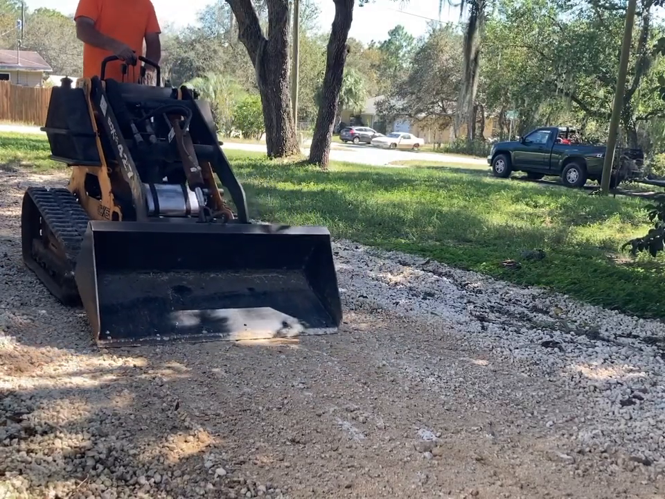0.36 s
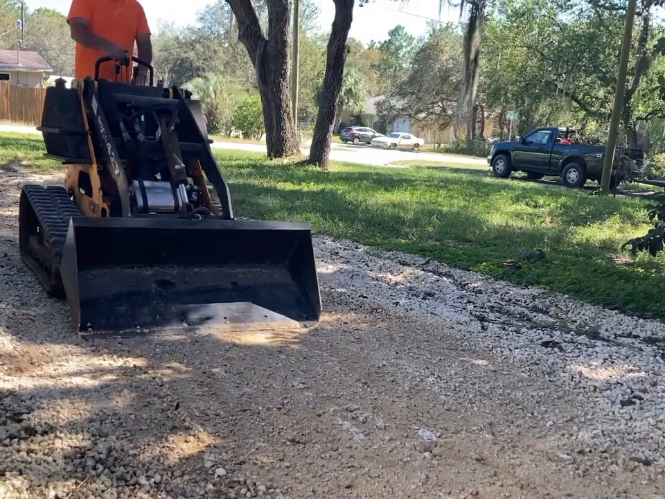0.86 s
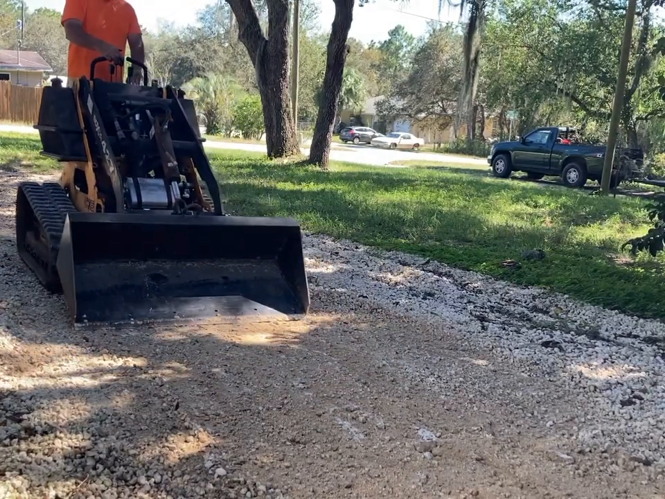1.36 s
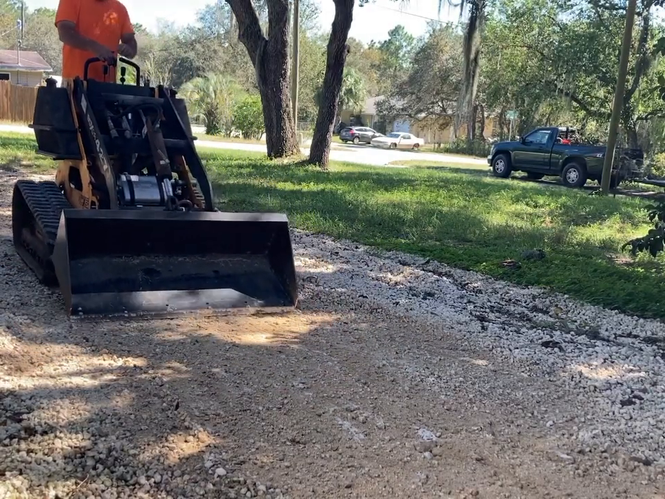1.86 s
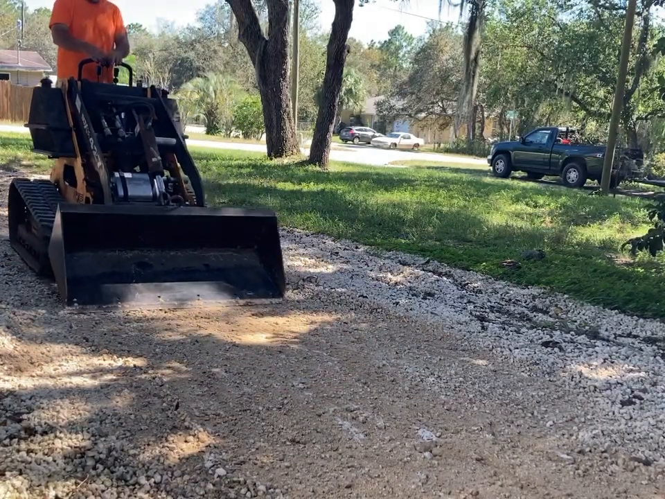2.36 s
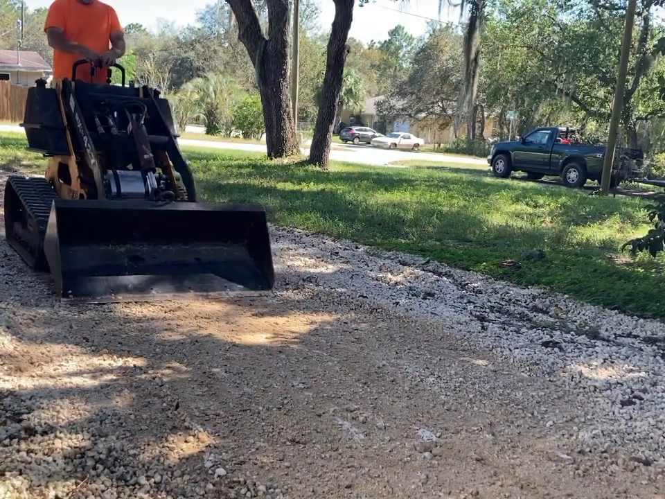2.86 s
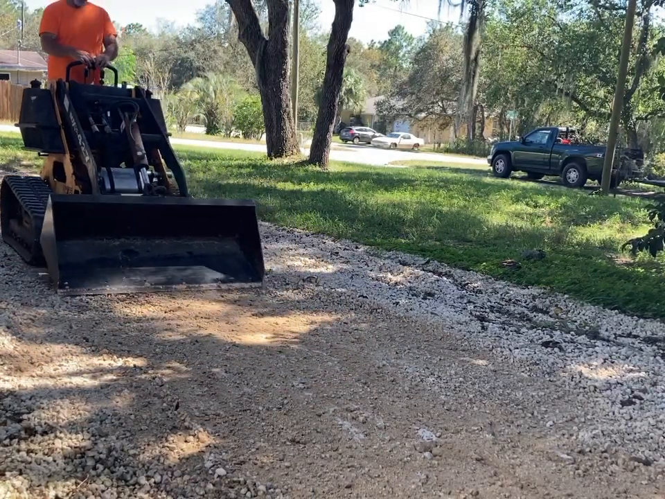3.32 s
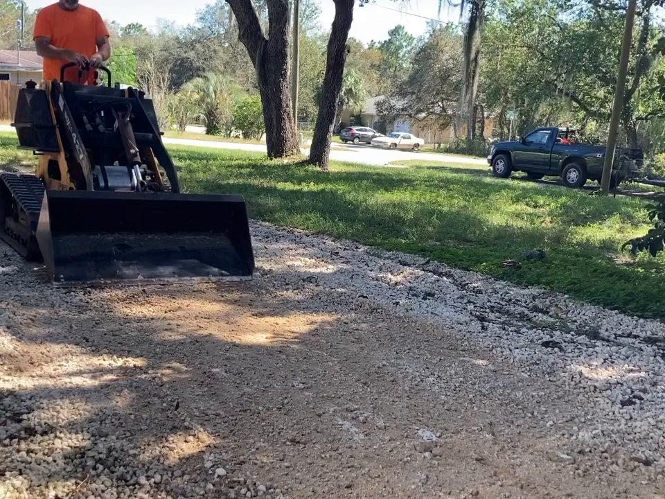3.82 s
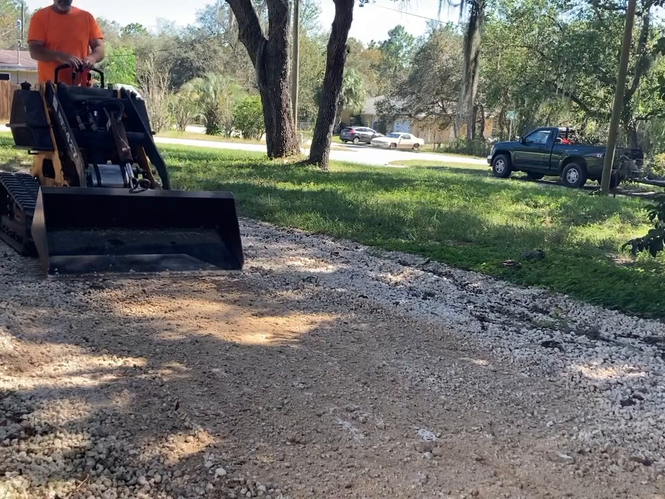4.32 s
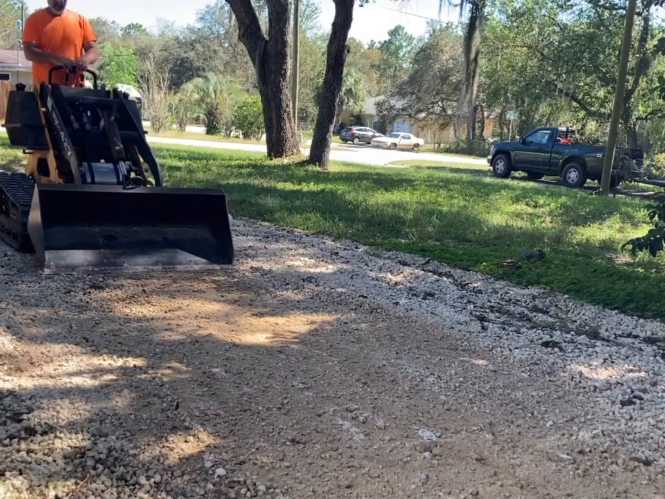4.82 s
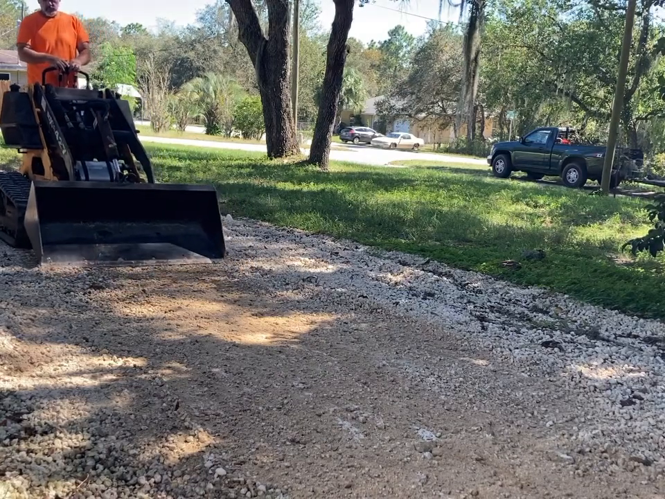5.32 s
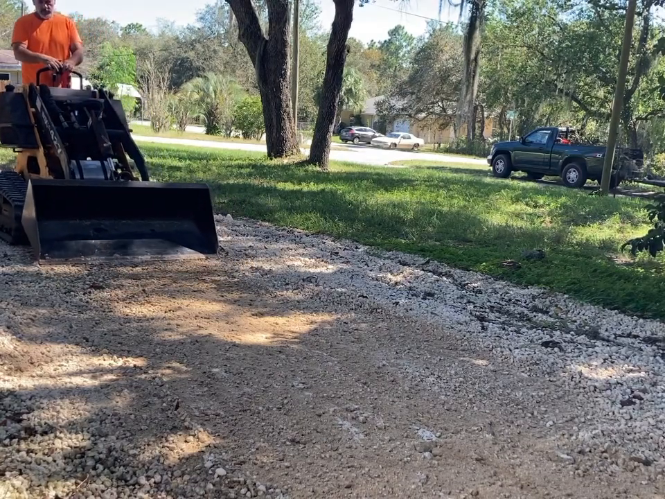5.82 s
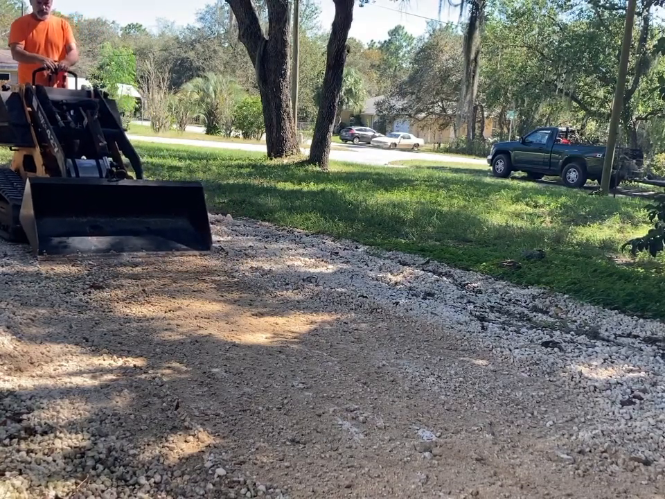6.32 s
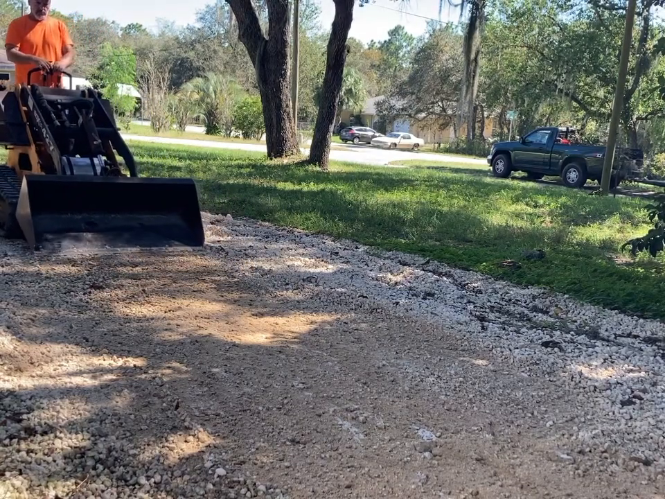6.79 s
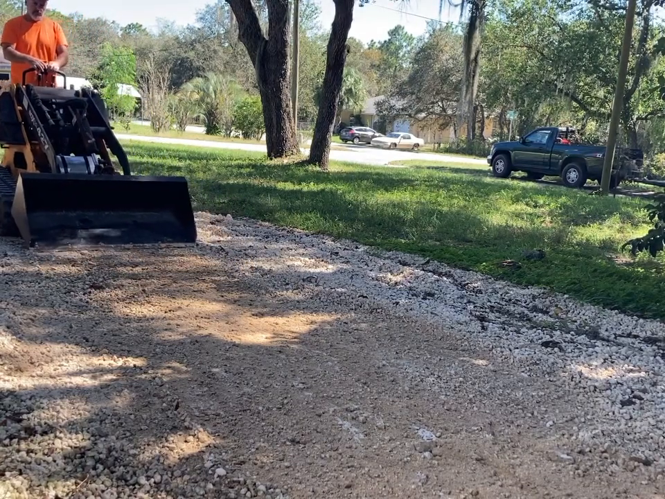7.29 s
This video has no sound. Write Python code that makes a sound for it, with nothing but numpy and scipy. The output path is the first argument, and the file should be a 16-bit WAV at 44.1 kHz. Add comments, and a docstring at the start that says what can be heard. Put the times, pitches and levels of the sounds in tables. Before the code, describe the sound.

Low, fluttering engine hum with mechanical clatter and fine hiss outdoors, while a steel bucket bangs irregularly, hardest near the end.

```python
"""Tracked loader backing away

A two-cylinder petrol engine on a small tracked loader backs slowly away over gravel, outdoors.
Cycle-locked partials make the muffler hum and whines; shaped noise makes clatter, whistles, crunch, air, puffs.
Grit bursts ring the loose steel bucket's modes as the tracks jolt. Two microphone ports hear it from the side.
"""
import sys
import numpy as np
from scipy import signal
from scipy.fft import rfft, irfft
from scipy.io import wavfile
from scipy.ndimage import uniform_filter1d

SR = 44100
rng = np.random.default_rng(int(sys.argv[2]) if len(sys.argv) > 2 else 0)


def nominal_scale(level):
    """Amplitude ratio for a level in decibels (scalar or array-like)."""
    x = np.asarray(level, float) / 20
    return 10 ** x


def master_out(mix):
    """Clip the mix to full scale and print it as 16-bit PCM to the path in sys.argv[1]."""
    frames = np.transpose(np.atleast_2d(mix))
    ceiling = np.clip(frames, -1, 1)
    pcm = np.round(ceiling * 32767).astype(np.int16)
    wavfile.write(sys.argv[1], SR, pcm)


N = 338247

# four-stroke cycle rate: start_s, cycles_per_s
SPEED = [(0.0, 23.69), (0.39, 24.185), (1.18, 24.386), (1.38, 24.991), (1.57, 25.462), (1.97, 25.439),
         (2.56, 25.69), (2.95, 25.513), (3.34, 25.906), (3.93, 25.546), (4.52, 25.774), (5.11, 25.698),
         (5.7, 25.507), (5.9, 25.04), (6.29, 24.954), (6.69, 25.137), (7.08, 25.072), (7.67, 24.673)]
# engine pull; eases as the loader coasts back, returns after the big jolt: start_s, load_0_to_1
LOAD = [(0, 0.69), (1.2, 0.72), (1.7, 0.74), (3, 0.46), (4.4, 0.25), (5.5, 0.24), (5.95, 0.78), (6.7, 0.68),
        (7.1, 0.85), (7.67, 0.85)]
TUNED_CYCLES_PER_S, CYCLE_AT_START = 25.4, -.078
START_M, BACKING_M_PER_S, PORT_HEIGHT_M, ENGINE_HEIGHT_M = 2.53, 0.56, 1.43, 0.56

T = np.arange(N) / SR
HZ = np.fft.rfftfreq(N, 1 / SR)
CYCLES = CYCLE_AT_START + np.cumsum(np.interp(T, *np.transpose(SPEED))) / SR


def evened(x):
    """Scales to rms 1 over all channels."""
    return x / np.sqrt(np.mean(x ** 2) + 1e-20)


def over_time(rows):
    """Interpolates a table's second column over T."""
    return np.interp(T, *np.transpose(rows))


def read(points, hz, order=1):
    """Interpolates one column of a table on a log frequency axis."""
    table = np.transpose(points)
    return np.interp(np.log(hz + 1), np.log(table[0] + 1), table[order])


def coloured(x, gain):
    """Filters by a gain on each bin of HZ."""
    return irfft(rfft(x) * gain, N)


def resonance(hz, centre_hz, width_hz):
    """Bell-shaped resonance curve, 1 at its centre."""
    return 1 / (1 + (2 * (hz - centre_hz) / width_hz) ** 2)


def wander(rate_hz, count):
    """Slow chance curves of rms 1."""
    knots = rng.standard_normal((count, 400))
    # 1.22 restores the rms lost between knots
    return 1.22 * np.array([np.interp(T * rate_hz, np.arange(400), k) for k in knots])


def beat(at_cycle, decay_cycles, spread_db):
    """Once a cycle a quick rise and a decay; each cycle has its own strength."""
    since = CYCLES + 1 - at_cycle
    strength = nominal_scale(spread_db * rng.uniform(-1, 1, size=220))[since.astype(int)]
    phase = since % 1
    return strength * (1 - np.exp(-phase / .025)) * np.exp(-phase / decay_cycles)


def distance_m():
    """The loader backs away at constant speed."""
    return START_M + BACKING_M_PER_S * T


def effort_db(db, load_db, far_db):
    """Level follows engine load (load_db at full load) and distance (far_db per doubling)."""
    return db + load_db * over_time(LOAD) + far_db * np.log2(distance_m() / START_M)


def partial_phase(order):
    """Two uneven firings, muffler chambers, a bass cut and speed sag each turn a partial's phase."""
    # chambers that set the timing of the partials: centre_hz, width_hz, signed_strength
    chamber_rows = [(50.4, 4.9, -.6), (94.2, 25.5, .33), (124.3, 48, -.096)]
    second_at_cycle, second_strength, bass_cut_hz = .441, 1.78, 165
    free_cycles_per_s, sag_cycles_per_s, lag_rad, no_lag_at = 25.75, .5, .28, .4
    hz = order * TUNED_CYCLES_PER_S
    firings = 1 + second_strength * np.exp(-2j * np.pi * order * second_at_cycle)
    chambers = sum(strength / (1 + 2j * (hz - f) / width) + strength / (1 + 2j * (hz + f) / width)
                   for f, width, strength in chamber_rows)
    s = 1j * hz / bass_cut_hz
    bass_cut = s * s / (s * s + np.sqrt(2) * s + 1)
    # at low speed each partial above the second lags more than the one below
    sag = np.tanh((free_cycles_per_s - over_time(SPEED)) / sag_cycles_per_s) - no_lag_at
    return np.angle(firings * chambers * bass_cut) - lag_rad * (order - 2) * sag


def exhaust(hum_waver_db=0.23, line_waver_db=1.5, slip_rad=0.35):
    """Clean partials locked to the cycle; the faint ones waver more in level and also in phase."""
    # hum partials, unloaded at tuned speed and start distance:
    # cycle_order, rms_db, full_load_gain_db, db_per_cycle_per_s, db_per_doubled_distance
    hum_rows = [(2, -18.5, -0.25, 0.2, -.5), (3, -31.5, 8, 1, -1.3), (4, -16.5, -1, 0.7, -0.9),
                (5, -21.5, 7, 0.05, -1.63), (9, -37.5, 0, 1.5, 0), (10, -34.5, 0, 3, -3),
                (12, -36.5, -10.5, -4, 1.5)]
    # faint exhaust partials, then valve-train and gear whine;
    # most swell to a peak and fade, some only fall, rise or hold steady:
    # cycle_order, rms_db_at_ref (before guards), ref_s, fade_db_per_s (away from ref_s)
    line_rows = [(6, -31, 3.5, 0.7), (7, -31, -8.5, 0.7), (8, -41.5, 0, 2.5), (11, -49, 8.5, 0),
                 (13, -44.5, 7, 2), (16, -49, 2, 1.5), (17, -38, 7.5, 5), (20, -45, 0, .9),
                 (24, -45, 0, 1.5), (25, -50.5, 3, 0), (26, -45, 2, .9), (27, -47, 1.8, 5),
                 (28, -44.5, .8, 4), (29, -48, .5, .8), (30, -51, 2, 2), (31, -43.5, 2.5, 1),
                 (32, -46, 3.5, 2.5), (34, -45, 3, 1.2), (35, -50, 2, 1), (36, -41, 4, 1.5),
                 (37, -44, 5, 4), (38, -46.5, 7, 6), (39, -52, 0, 1.5), (40, -42, 3.2, 1.3),
                 (42, -48, 5, 1.5), (44, -50, 5.5, 3), (47, -53, 5.5, 1.5), (48, -47, 5, .8),
                 (52, -50, 6.3, 2), (56, -47, 3.5, 1.4), (60, -54, 5, 2), (62, -51, 4, 3),
                 (63, -52, 2.7, 1.2), (66, -51, 2, 1.3), (68, -54, 3, 3)]
    # thin guards that sing when a faint partial crosses them: centre_hz, width_hz, boost_db
    guard_rows = [(950, 16, 6), (1168, 14, 8)]
    cycles_per_s = over_time(SPEED)
    faster = cycles_per_s - TUNED_CYCLES_PER_S
    out = np.zeros(N)

    sway = wander(9, count=len(hum_rows))
    for (order, db, load_db, speed_db, far_db), level_sway in zip(hum_rows, sway):
        level_db = effort_db(db, load_db, far_db) + speed_db * faster + hum_waver_db * level_sway
        out += nominal_scale(level_db) * np.cos(2 * np.pi * order * CYCLES + partial_phase(order))

    sway = wander(3.5, count=2 * len(line_rows)).reshape(-1, 2, N)
    for (order, db, ref_s, fade_db), (level_sway, phase_sway) in zip(line_rows, sway):
        sung_db = sum(boost_db * resonance(order * cycles_per_s, f, width)
                      for f, width, boost_db in guard_rows)
        level_db = db - abs(fade_db * (T - ref_s)) + sung_db + line_waver_db * level_sway
        phase = 2 * np.pi * order * CYCLES + partial_phase(order) + slip_rad * phase_sway
        out += nominal_scale(level_db) * np.cos(phase)
    return np.sqrt(2) * out  # amplitudes were rms


def clatter(patchy_db=1.5):
    """Block and tracks: noise that swells twice a cycle, rings in the panels and comes in patches."""
    # spectrum before scaling to rms 1: freq_hz, relative_db
    spectrum = [(15, -15.5), (30, -33), (62, -22.5), (90, -19.5), (140, -15.5), (200, -20), (315, -21.5),
                (365, -25.5), (730, -29), (1000, -29), (1400, -31), (2000, -37.5), (2700, -40), (3600, -37),
                (5500, -38), (7000, -59), (9000, -128)]
    # panel resonances: centre_hz, width_hz, boost_or_dip_db
    panel_rows = [(230, 27, 0.5), (450, 51, -2), (544, 19, 4), (900, 140, 6.5)]
    throb = 1 + .8 * beat(.33, .15, 4) + .4 * beat(.63, .15, 4)
    hz, t, z = signal.stft(throb * rng.standard_normal((2, N)), SR, nperseg=512)
    patches = rng.standard_normal(z.shape[1:])
    patches = evened(uniform_filter1d(uniform_filter1d(patches, size=7, axis=0), size=10, axis=1))
    # the band around 2.2 kHz dulls with distance
    bright_band = np.exp(-np.log(hz[:, None] / 2200 + 1e-9) ** 2 / .5)
    bright_db = np.interp(t, T, effort_db(9.5, 0, -4)) * bright_band
    x = signal.istft(z * nominal_scale(patchy_db * patches + bright_db), SR, nperseg=512)[1][:, :N]
    rings_db = sum(db * resonance(HZ, f, width) for f, width, db in panel_rows)
    rattle = evened(coloured(x, nominal_scale(read(spectrum, HZ) + rings_db)))
    return nominal_scale(effort_db(-28.5, 1, -0.1)) * rattle


def bucket(uneven_db=1.55, small_db=-34, small_load_db=9, small_per_s=40, thin_hz=330, dull_hz=750):
    """Jolts: a tick and scrape of grit ring the modes unevenly; small random ones hit harder under load."""
    # start_s, ring_peak_db, then relative to the ring: boom_db, upper_modes_db (per octave over dull_hz,
    # one octave at most), gravel_crack_db
    clank_rows = [(.1, -18.5, -9, 1, -27), (.269, -29, 12, -13, -20), (.379, -20, -15, -9, -12),
                  (.408, -19.5, -3, -4, -6), (.72, -23, 3, -12, -22), (.779, -17, 2, -19, -31),
                  (.841, -24, -3, -12, -24), (.924, -16.5, -2, -26, -8.5), (.955, -17, -27, -18, -28),
                  (1.136, -25, 8, -10, -13), (1.375, -18, -7, -8, -20), (1.477, -17.5, -23, -21, -24),
                  (1.988, -14, -0.5, -15, -24), (2.123, -27, -12, -8, -21), (2.68, -15.5, -5, -14, -24),
                  (2.7, -22, -14, -19, -22), (3.256, -15, -6, -14, -27), (3.275, -20, -11, -10, -25),
                  (3.798, -23, -5, -12, -14), (3.873, -15, -11, -15, -21), (4.921, -17, -3, -11, -15),
                  (5.629, -11.5, -26, -10, -15), (5.674, -7, -4.5, -9, -13), (5.764, -8, -14, -18, -12),
                  (5.796, -18, -9, -7, -11), (5.868, -16, -15, -6, -23), (5.888, -12.5, -4, -9, -10.5),
                  (5.99, -17.5, -9, -15, -24), (6.098, -20, -15, -8, -17), (6.19, -26, -18, -15, -20),
                  (6.29, -40, -23, -15, -22), (6.347, -21, -23, -13, -25), (6.55, -24, -6, -17, -20),
                  (6.748, -11, -15, -16, -23), (6.762, -10, -26, -33, -30), (6.774, -22, -16, -12, -25),
                  (6.797, -19, 5, -16, -22), (7.03, -16, -7, -13, -18), (7.074, -17, -2, -14, -17),
                  (7.133, -15, -10, -15, -18), (7.187, -13.5, -1, -22, -15), (7.243, -17.5, -21, -8, -14),
                  (7.369, -21, -28, -14, -25), (7.493, -8, -24, -10, -20), (7.504, -11, -21, -8, -29),
                  (7.52, -23, -15, 6, -21), (7.566, -16.5, -2, -10, -16)]
    # steel modes: freq_hz, level_db, t60_s
    mode_rows = [(300, -6.5, 0.1), (400, -1.5, 0.079), (425.3, 1, 0.11), (527, -13, 0.025),
                 (557.5, 5.5, 0.069), (649, 2.5, 0.035), (794, -3, 0.06), (914, -0.5, 0.07),
                 (1051, 3, 0.09), (1322, -6, 0.1), (1450, 0, 0.031), (1800, 2.5, 0.054), (1923, -5.5, 0.21),
                 (2000, 8, 0.033), (2340, 0, 0.05), (2550, -1.5, 0.073), (2980, -5, 0.086),
                 (3174, -2.5, 0.093), (4850, -3, 0.15)]
    # bucket floor: freq_hz, t60_s
    boom_hz, boom_t60_s = (176.3, 0.2)
    # crack spectrum: freq_hz, relative_db
    gravel_spectrum = [(500, -7), (1500, -0.5), (3000, 0), (5500, -1), (7500, 0), (9000, -21), (12000, -50)]
    scrape_s, scrape_rise_s, tick = 0.0095, .004, 4.5

    blows = list(clank_rows)
    for fraction, chance in rng.random((round(small_per_s * N / SR), 2)):
        s = fraction * (N / SR)
        load = np.interp(s, *np.transpose(LOAD))
        blows.append((s, small_db + small_load_db * load + 6 * chance, -4, -10, -25))

    t, out = np.arange(8000) / SR, np.zeros((2, N + 12000))
    f, mode_db, t60 = np.transpose(mode_rows)[:, :, None]
    modes = nominal_scale(mode_db - 60 * t / t60) * np.sin(2 * np.pi * f * t)
    boom = nominal_scale(-60 * t / boom_t60_s) * np.sin(2 * np.pi * boom_hz * t) * (1 - np.exp(-t / 0.0026))
    gravel = nominal_scale(read(gravel_spectrum, np.fft.rfftfreq(2000, 1 / SR)))
    short_t = t[:2000]
    scrape = np.exp(-short_t / scrape_s) * (1 - np.exp(-short_t / scrape_rise_s))

    unevenness = rng.standard_normal((len(blows), len(mode_rows), 1))
    grit = rng.standard_normal((len(blows), 2, 2000))
    clumps = evened(uniform_filter1d(rng.standard_normal(grit.shape), size=60))  # stones catch in clumps
    grit *= nominal_scale(2.5 * clumps)
    drive = grit * scrape
    drive[..., 20] += tick  # first contact
    drive = signal.lfilter(*signal.butter(2, thin_hz, "high", fs=SR), drive)
    # every mode takes a like share of the scrape
    at_modes = abs(drive @ np.exp(-2j * np.pi * f * short_t).T)
    share = 1 / (at_modes + .3 * at_modes.mean())

    upper = np.clip(np.log2(f / dull_hz), 0, 1)
    for blow, uneven, noise, push, weights in zip(blows, unevenness, grit, drive, share):
        s, peak_db, boom_db, upper_db, crack_db = blow
        body = weights @ (nominal_scale(uneven_db * uneven + upper_db * upper) * modes)
        ring = signal.fftconvolve(push, body, axes=1)[:, :8000]
        ring = ring / abs(ring).max() + nominal_scale(boom_db) * boom
        crack = np.sqrt(scrape) * evened(irfft(rfft(noise) * gravel))
        ring[:, :2000] += nominal_scale(crack_db) * crack
        out[:, round(s * SR):][:, :8000] += nominal_scale(peak_db) * ring
    return out[:, :N]


def over_gravel(x, echo=0.2, dull_hz=2500):
    """Adds the ground echo: its detour shortens with distance, its treble is lost among the stones."""
    detour_s = 2 * PORT_HEIGHT_M * ENGINE_HEIGHT_M / distance_m() / 343
    dull = coloured(x, 1 / np.sqrt(1 + (HZ / dull_hz) ** 4))
    return x + echo * np.array([np.interp(T - detour_s, T, c) for c in dull])


def whistles_and_crunch(waver_db=1.2):
    """Noise bands: thin machine whistles and two broad bands of gravel crunch late on; all throb and waver."""
    # thin machine whistles, then gravel crunch in the last two rows:
    # centre_hz, width_hz, peak_rms_db, peak_s, fade_db_per_s (before and after)
    band_rows = [(1170, 25, -43, 0.79, 3.5), (1587, 33, -44.5, 3.3, 1.5), (1689, 65, -35.5, 1.16, 2.5),
                 (1750, 38, -43.5, 3.8, 2.5), (2257, 90, -40.5, 1.1, 4), (2374, 63, -40, 1.7, 3.8),
                 (2275, 60, -48, 5.1, 7), (2395, 70, -45, 6.8, 4.5), (2940, 60, -41.5, 0.11, 3.5),
                 (4800, 1000, -44.5, 6.5, 4), (7070, 390, -48, 5.9, 7)]
    throb = 1 + 0.19 * beat(0.25, 0.13, 2.2)
    noise = throb * rng.standard_normal((len(band_rows), 2, N))
    sway = wander(18, count=len(band_rows))
    out = np.zeros((2, N))
    for (f, width, db, peak_s, fade_db), x, level_sway in zip(band_rows, noise, sway):
        level_db = db - abs(fade_db * (T - peak_s)) + waver_db * level_sway
        out += nominal_scale(level_db) * evened(coloured(x, resonance(HZ, f, width)))
    return out


def ports(direct, scattered):
    """The right port hears part of the direct sound and part of a scattered copy."""
    # freq_hz, likeness_0_to_1, left_lead_rad
    likeness_rows = [(60, .995, 0), (140, .99, .1), (220, .94, .2), (500, .88, .5), (800, .85, 1.1),
                     (950, .55, 1.4), (1300, .68, 1.3), (1750, .5, 2.2), (2300, .7, 1.4), (3500, .66, 2.7),
                     (5200, .6, 4)]
    # freq_hz, left_minus_right_db
    lean_rows = [(60, -3), (140, -3.1), (220, -0.5), (500, -1), (950, 3.5), (1300, 3.5), (2400, 1),
                 (3500, 1), (5200, 0.5)]
    same = read(likeness_rows, HZ)
    turn = nominal_scale(read(lean_rows, HZ) / 2) * np.exp(.5j * read(likeness_rows, HZ, order=2))
    left = coloured(direct, turn)
    right = coloured(direct, same / turn) + coloured(scattered, np.sqrt(1 - same ** 2) / turn)
    return np.array([left, right])


def hiss(far_side_db=-3.0, waver_db=2.0, lag_s=.000219):
    """Air and valve puff reach the left port late and inverted; far-side air reaches it first, inverted."""
    # cooling air: freq_hz, relative_db
    air_spectrum = [(2500, -15), (4500, -14), (6000, 1.5), (7300, 6.5), (10000, 2.5), (12800, -1),
                    (14500, -6.5), (16500, -18)]
    # valve puff: freq_hz, relative_db
    puff_spectrum = [(3000, -49), (6000, -6), (8000, 1.5), (11000, 3), (13000, -0.5), (16500, -4.5)]
    near_noise, far_noise, puff_noise = rng.standard_normal((3, N))
    air = evened(coloured(np.array([near_noise, far_noise]), nominal_scale(read(air_spectrum, HZ))))
    puffs = beat(0.258, 0.16, 3.8) * nominal_scale(waver_db * wander(5.8, count=1)[0]) * puff_noise
    puffs = evened(coloured(puffs, nominal_scale(read(puff_spectrum, HZ))))
    near = air[0] + nominal_scale(effort_db(-2, 2.5, -1.5)) * puffs
    far = nominal_scale(far_side_db) * air[1]
    lag = -np.exp(-2j * np.pi * HZ * lag_s)
    left = coloured(near, lag) + coloured(far, lag.conj())
    return nominal_scale(effort_db(-41.5, 1.46, -0.55)) * np.array([left, near + far])


def scene():
    """Machine over gravel and hum through the ports, plus air."""
    hum = exhaust()
    machine = over_gravel(clatter() + bucket()) + whistles_and_crunch()
    return ports(machine[0] + hum, machine[1]) + hiss()


def roll_off(x):
    """The treble ends steeply here."""
    return signal.sosfilt(signal.butter(12, 17100, fs=SR, output="sos"), x)


def record(dry, knee=.6, room=.32, offset=-.0034, edge_hz=15850):
    """The microphone rounds the highest peaks and sits slightly off zero; a band limit follows."""
    over = np.sign(dry) * (knee + room * np.tanh((abs(dry) - knee) / room))
    rounded = np.where(abs(dry) > knee, over, dry)
    return roll_off(coloured(rounded + offset, HZ < edge_hz))


dry = scene()
out = record(dry)
master_out(out)
```